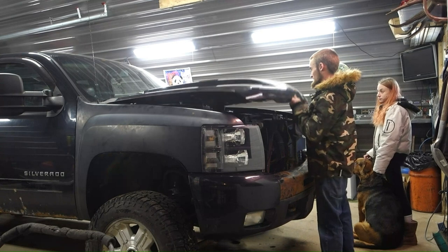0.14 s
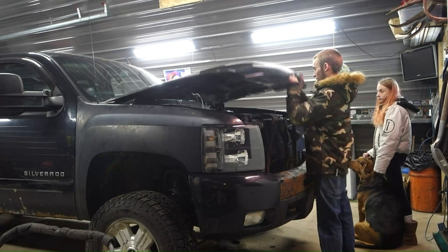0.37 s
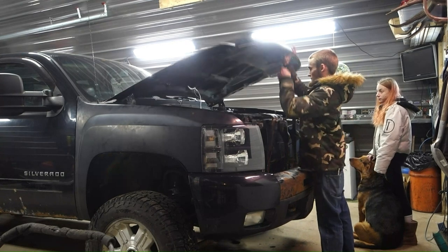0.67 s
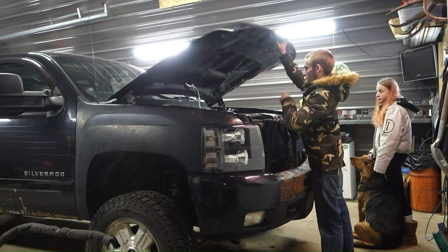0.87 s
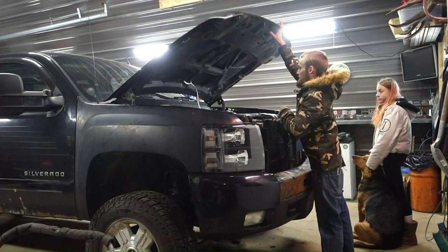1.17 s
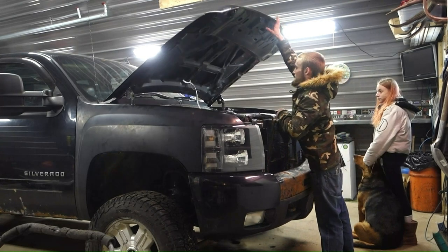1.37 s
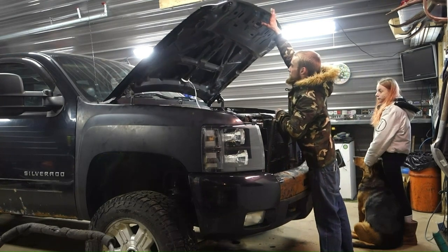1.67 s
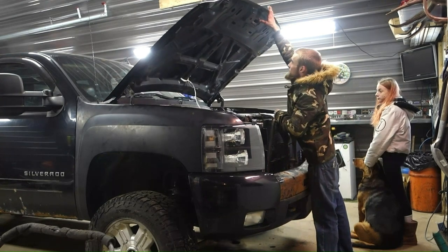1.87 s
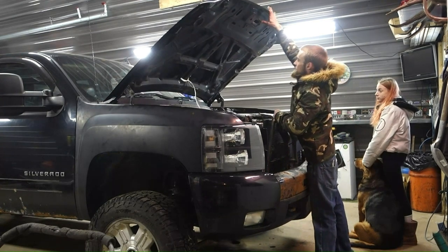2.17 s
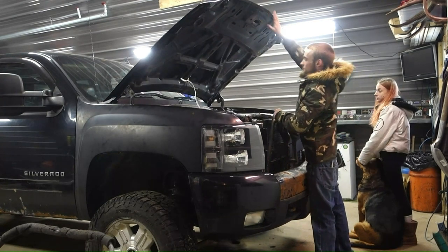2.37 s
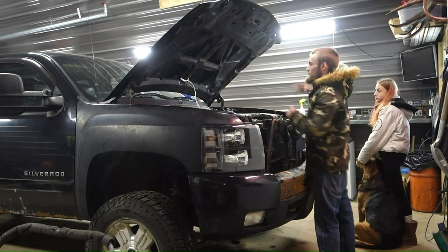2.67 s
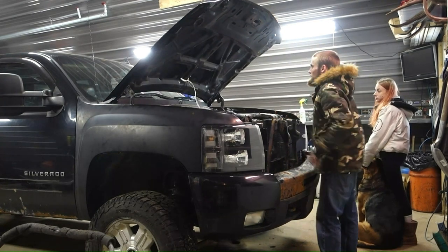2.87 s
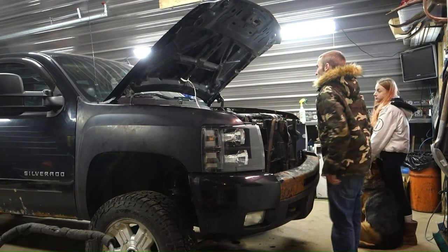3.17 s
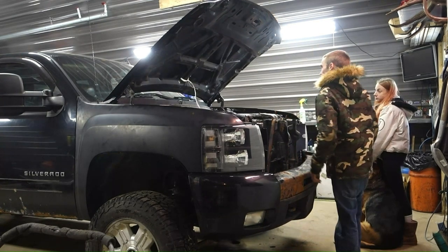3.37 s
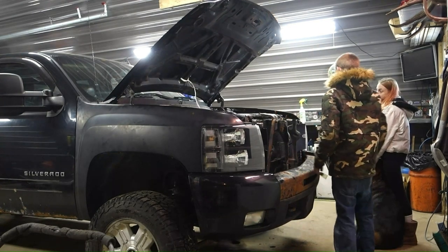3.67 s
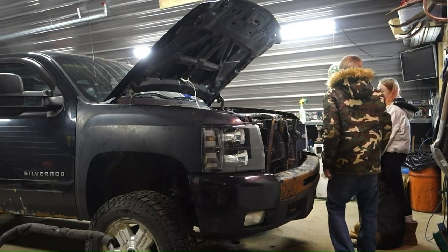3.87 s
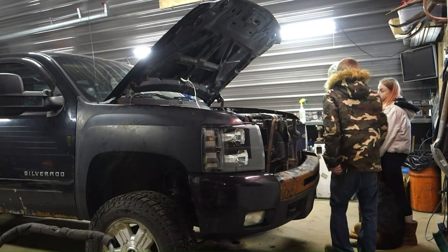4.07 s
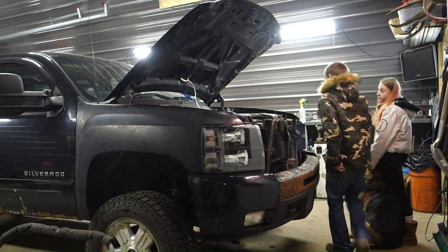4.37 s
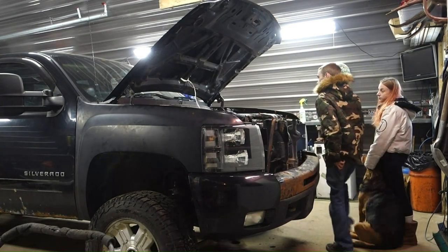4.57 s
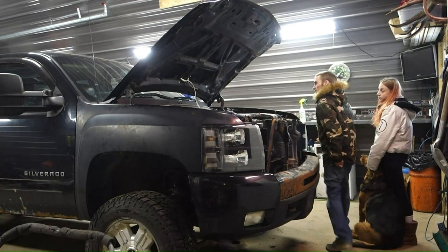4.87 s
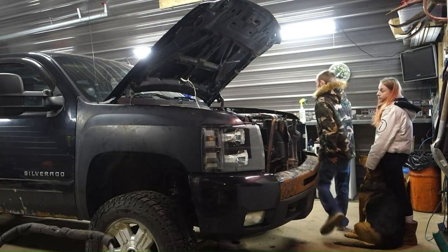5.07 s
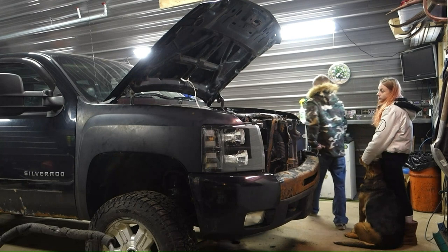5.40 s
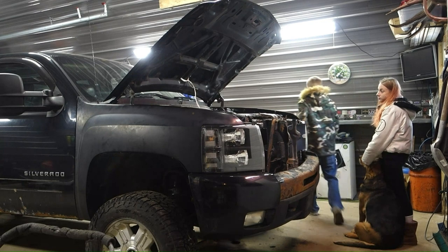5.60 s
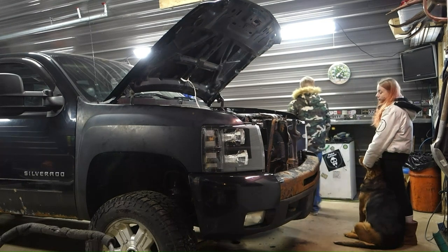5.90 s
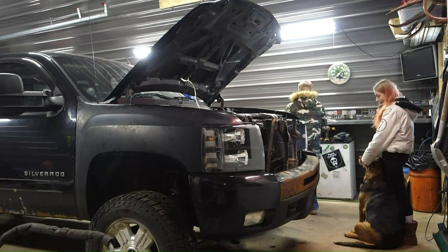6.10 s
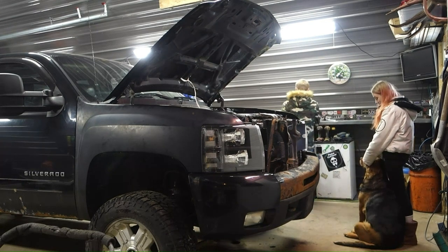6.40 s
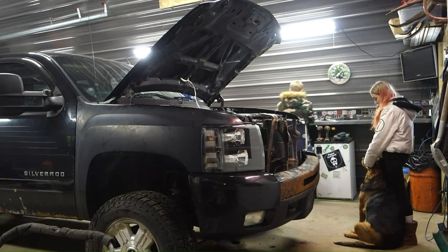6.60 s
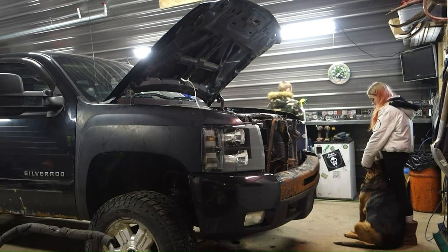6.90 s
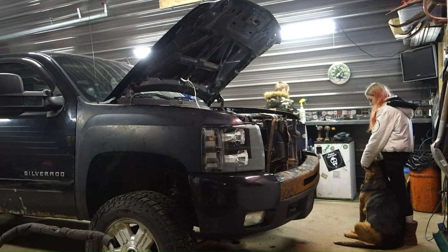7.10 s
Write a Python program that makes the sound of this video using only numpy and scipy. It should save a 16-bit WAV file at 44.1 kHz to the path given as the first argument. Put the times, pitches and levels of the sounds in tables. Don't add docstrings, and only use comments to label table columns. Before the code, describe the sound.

A low, steady heater fan drones throughout, mostly deep rumble with a duller airy roar, its hum beating about three times a second and irregular soft gusts booming in the duct. At 0.05 seconds a truck hood latch clacks free, loud and sharp, followed within forty milliseconds by a heavier rebound and a loose knock; the garage answers with a half-second tail. A faint thud comes at 0.5, then soft heel falls near 1.9. From about 2.5 to 6.1, boots scuff and step over gritty concrete, quiet and crisp, the grit growing finer and hissier. At 6.6 a last scuff merges with a light metal handle rattle, bouncing for a tenth of a second. From 6.84 to 7.1 steel tools tick and clatter brightly on a metal bench, loudest near 7.04, ringing briefly until the end. Close stereo microphones, hard-walled room.

```python
import sys
import numpy as np
from scipy import signal
from scipy.io import wavfile
from scipy.ndimage import uniform_filter1d

SR = 44100
rng = np.random.default_rng(int(sys.argv[2]) if len(sys.argv) > 2 else 0)


def wrap_up_sound(samples):
    columns = np.atleast_2d(samples).T
    tamed = np.clip(columns, -1, 1)
    steps = np.round(tamed * 32767).astype(np.int16)
    wavfile.write(sys.argv[1], SR, steps)


def gain_from_decibels(decibels):
    exponent = np.asarray(decibels, float) / 20
    return 10 ** exponent


N = 319725

# pitch_hz, level_db [dB per Hz]
FAN_RUMBLE = [(20, -21), (38, -20), (50, -11), (64, -1), (76, 3), (110, -2), (131, -1.5), (168, 1.5),
              (185, -10), (225, -11), (275, -16.5), (283, -6.5), (320, -10.5), (345, -5)]
# pitch_hz, level_db [dB per Hz]
FAN_ROAR = [(346, -5), (414, -2), (509, -16), (554, -4.5), (635, -26), (715, -16), (893, -16), (1230, -18),
            (1340, -19.5), (2620, -24.5), (5000, -43.5), (9000, -46.5), (15800, -41)]
# pitch_hz, width_hz, lift_db
DUCT = [(296.8, 17.2, 9), (317.7, 18.7, 10), (452, 21.3, 4.5), (531, 47, 4.5), (711, 94, 11.5),
        (790, 8.4, -20), (1027, 200, 6.5), (1246, 32, 9), (1673, 69, 3), (1980, 140, 3.5), (2560, 16, 12.5),
        (2760, 60, 4), (3171, 6.7, 13), (3320, 33, 9)]
# time_s, rumble_db, roar_db
SWELL = [(0.0, 3.5, 2.5), (7.25, 4.5, 1.5)]
# order [multiple of shaft speed], level_db [rms]
SHAFT_ORDERS = [(1, -37), (3, -55), (4, -47.5), (5, -43.5)]
# peak_s, peak_db [rms], length_s
GUSTS = [(0.067, -27, 0.061), (0.744, -27, 0.078), (0.907, -25, 0.037), (1.406, -25.5, 0.12),
         (1.936, -29.5, .18), (2.11, -25.5, 0.03), (2.81, -33.5, 0.042), (3.803, -31, .09),
         (4.138, -27, 0.13), (4.283, -27, 0.071), (4.477, -29, .078), (4.747, -27, .06),
         (5.006, -28.5, 0.069), (5.237, -31, 0.097), (5.343, -30, 0.062), (5.564, -26, 0.075),
         (3.16, -31.5, 0.13), (6.03, -29.5, .16), (6.389, -21.5, 0.054), (6.927, -25.5, 0.071),
         (7.064, -25.5, 0.079)]
# pitch_hz, likeness [-1 to 1]
FAN_LIKENESS = [(130, 1), (290, 0.98), (640, 0.95), (1400, 0.88), (2500, 0.91), (3500, 0.58), (4800, 0),
                (7000, 0.23), (12000, 0.38)]
# pitch_hz, left_minus_right_db
FAN_BALANCE = [(60, -2.3), (130, 0.14), (290, 0.5), (640, -0.5), (1410, -0.56), (3100, -2.9), (6820, -0.21),
               (15000, 1)]
# start_s, peak_db, rattle_length_s, treble_db, bass_db
LATCH_BLOWS = [
    (0.0463, -6, 0.0085, 1.5, -11),
    (0.064, -14.5, 0.014, -0.5, 6),
    (0.084, -18.5, 0.0067, 1, 8),
]
# pitch_hz, level_db, t60_s
HOOD_MODES = [(428, 3.5, 0.065), (480, -5, 0.46), (604, -32, 5.0), (690, -17.5, 1.1), (980, -20, 0.84),
              (1194, -21, 0.89), (1450, -20, 0.55), (1518, -34, 0.6), (1510, -29, 0.98), (1720, -10, 0.3),
              (1900, -32, 0.74), (1870, -31, 0.28), (2060, -20, 0.14), (2674, -15, 0.73), (2702, -20, 0.65),
              (3300, -19, 0.33), (3720, -42, 0.59), (5631, -47, 0.28)]
# pitch_hz, level_db [dB per Hz]
HOOD_CRACK = [(120, -48), (200, -18), (278, 1.5), (440, -3.5), (806, -16.5), (1160, -7), (2130, -9.5),
              (2290, -12.5), (3370, -19.5), (4430, -36.5), (16000, -44)]
# start_s, peak_db, pitch_hz
HEELS = [
    (0.46, -30, 310),
    (1.857, -31, 790),
    (1.886, -28.5, 440),
    (4.499, -31, 580),
    (4.864, -32, 680),
    (5.419, -34, 740),
    (5.74, -31, 304),
    (6.11, -35, 806),
]
# start_s, peak_db, slide_length_s, sole_resonance_hz, grit_hiss_db
SCUFFS = [(2.465, -45, 0.053, 2560, -7), (3.086, -30, 0.047, 2420, -4), (3.108, -28.5, 0.046, 2330, -1.5),
          (3.355, -39.5, 0.054, 1978, -7), (3.6, -34.5, 0.045, 2470, -0.5), (3.625, -33, 0.038, 2560, -8),
          (4.161, -33, 0.069, 2360, 4.5), (4.212, -27.5, 0.054, 2420, -6), (4.4, -34, 0.032, 2800, -1),
          (4.555, -27.5, 0.042, 1880, -7), (4.994, -30.5, 0.025, 2563, 0), (5.405, -33, 0.043, 2304, 13.5),
          (5.481, -33, 0.041, 2400, 4), (5.666, -30, 0.026, 2560, -1), (6.037, -26, 0.044, 2700, 5),
          (6.088, -39.5, 0.056, 2887, 9), (6.593, -37.5, 0.032, 3300, 15), (6.605, -32, 0.049, 2570, 7)]
# pitch_hz, level_db [dB per Hz]
GRIT = [(700, -42), (1300, -10.5), (2000, -8.5), (2900, -9), (3800, -11.5), (6000, -12), (9200, -15.5),
        (14700, -23), (16000, -24)]
# start_s, peak_db, rattle_length_s, treble_db, bass_db
HANDLE_BLOWS = [
    (6.608, -20, 0.013, 7.5, -3),
    (6.623, -18.5, 0.022, 0.5, -4),
    (6.654, -26, 0.021, 4, 9),
    (6.675, -23, 0.0095, 4, 14),
    (6.698, -33, 0.009, 9, 3),
]
# pitch_hz, level_db, t60_s
HANDLE_MODES = [(517, -7, 0.35), (572, 0, 0.72), (1604, -0.5, 0.49), (2025, 1, 0.4), (2150, -12, 0.33),
                (2530, -14, 0.46), (2860, -2, 0.36), (2970, -11, 0.52), (3640, -5, 0.44), (4460, -20, .3)]
# pitch_hz, level_db [dB per Hz]
HANDLE_CRACK = [(530, -42), (900, -8), (1340, -24), (1470, -34), (1570, -10), (2220, 2), (3380, -12),
                (3680, -11.5), (5350, -21.5), (16000, -37)]
# start_s, peak_db, rattle_length_s, treble_db, bass_db
TOOL_BLOWS = [
    (6.841, -10, 0.014, 10.5, -6),
    (6.928, -11.5, 0.0081, 8, -4),
    (6.959, -9.5, 0.037, 9, -2.5),
    (6.989, -22.5, 0.0067, 2.5, -2),
    (7.041, -7, 0.009, 3, 1.5),
    (7.088, -13, .008, 6.5, 8),
    (7.099, -13.5, 0.011, 6, -3),
]
# pitch_hz, level_db, t60_s
BENCH_MODES = [(364, -2, 0.84), (398, 6, 0.66), (485, -14, 0.6), (526, 5, 0.64), (745, 4, 0.72),
               (790, 2, 0.85), (916, -4, 0.27), (1233, 15, 0.12), (1400, -3, 3.9), (1610, -18, 0.3),
               (1626, -27, 0.31), (1690, -20, 0.34), (1940, 10, 0.19), (2120, 8, 0.23), (2370, -4, 0.52),
               (2524, 0, 0.72), (2780, -3, 0.23), (3155, -57, 0.83), (3200, -35, 0.46), (3500, -11, 0.41)]
# pitch_hz, level_db [dB per Hz]
BENCH_CRACK = [(150, -46.5), (250, -9), (367, 1), (444, -3.5), (510, -4), (723, -6.5), (1160, -8.5),
               (1910, -7.5), (3340, -18), (3770, -35), (16000, -38)]
# pitch_hz, level_db, t60_s
PART_MODES = [(4550, -12, .008), (7600, -2, .03), (7900, 0, .04), (8150, -5, .02), (10500, -6, .02),
              (11000, -6, .02), (14600, -10, .012)]
# pitch_hz, t60_s
GARAGE = [(200, 0.34), (500, 0.53), (1200, 0.58), (2500, 0.52), (5000, 0.54), (10000, 0.36), (16000, 0.45)]
# pitch_hz, likeness [-1 to 1]
WALL_LIKENESS = [(150, 0.9), (500, 0.97), (1200, 0.85), (2400, 1), (3500, 0.28), (4500, -0.18),
                 (7000, -0.024), (12000, 0.34)]
# pitch_hz, left_minus_right_db
WALL_BALANCE = [(500, 0.5), (1500, 1), (2400, 1), (3500, -6), (5000, -5), (7000, -1), (12000, 1.5)]


def evened(x):
    return x / np.sqrt(np.mean(x ** 2) + 1e-20)


def read(points, hz):
    f, value = np.transpose(points)
    return np.interp(np.log(hz + 1), np.log(f + 1), value)


def pair(level_db, size, likeness, balance):
    hz = np.fft.rfftfreq(size, 1 / SR)
    a, b, c, d = rng.standard_normal(level_db.T.shape + (4,)).T
    like = np.clip(read(likeness, hz), -1, 1)[:, None]
    left = a + 1j * b
    right = like * left + np.sqrt(1 - like ** 2) * (c + 1j * d)
    lead_s = 3.5e-5 * (hz < 3500)
    right = right * np.exp(2j * np.pi * hz * lead_s)[:, None]
    half_db = read(balance, hz)[:, None] / 2
    spectra = np.array([left * gain_from_decibels(half_db), right * gain_from_decibels(-half_db)]) * gain_from_decibels(level_db)
    return signal.istft(spectra, nperseg=size, noverlap=size - size // 4)[1]


def drone(spectrum, db, swell_column, size, patchy_db):
    hz = np.fft.rfftfreq(size, 1 / SR)
    t = np.arange(4 * N // size + 5) * size / 4 / SR
    lift_db = sum(lift / (1 + ((hz - f) / (width / 2)) ** 2) for f, width, lift in DUCT)
    inside = (hz >= spectrum[0][0]) & (hz <= spectrum[-1][0])
    inside_db = np.where(inside, 0, -80)
    patches = uniform_filter1d(rng.standard_normal((len(t), len(hz))), size=6, axis=0)
    patches = evened(uniform_filter1d(patches, size=30, axis=1)).T
    swell = np.array(SWELL)
    swell_db = np.interp(t, swell[:, 0], swell[:, swell_column])
    field_db = (read(spectrum, hz) + lift_db + inside_db)[:, None] + patchy_db * patches
    noise = pair(field_db + swell_db, size, FAN_LIKENESS, FAN_BALANCE)[:, :N]
    return gain_from_decibels(db) * evened(noise)


def hum():
    shaft_hz, mains_hz, mains_db, in_step_s = 56.9, 60.02, -35, 2.52
    turn = 2 * np.pi * (np.arange(N) / SR - in_step_s)
    shaft = sum(gain_from_decibels(db) * np.cos(order * shaft_hz * turn) for order, db in SHAFT_ORDERS)
    mains = gain_from_decibels(mains_db) * np.cos(mains_hz * turn)
    return np.sqrt(2) * (shaft + mains)


def boom():
    boom_hz, width_hz, murmur_db, gust_detune = 149.6, 5, -35.5, 0.011
    t = np.arange(N) / SR
    r = np.exp(-np.pi * width_hz / SR)
    turbulence = rng.standard_normal(N) + 1j * rng.standard_normal(N)
    murmur = signal.lfilter([1 - r], [1, -r], turbulence)
    murmur = murmur * gain_from_decibels(murmur_db) / np.sqrt(np.mean(abs(murmur) ** 2))
    swell = np.zeros(N, complex)
    for s, db, length in GUSTS:
        start, end = round((s - 2 * length) * SR), round((s + 2 * length) * SR)
        near = slice(max(start, 0), end)
        u = t[near] - s
        bell = np.exp(-(2 * u / length) ** 2 * np.log(2))
        offset_hz = boom_hz * gust_detune * rng.standard_normal()
        swell[near] += gain_from_decibels(db) * bell * np.exp(2j * np.pi * offset_hz * u)
    calm = 1 / (1 + (abs(swell) / gain_from_decibels(murmur_db)) ** 2)
    return np.sqrt(2) * ((swell + calm * murmur) * np.exp(2j * np.pi * boom_hz * t)).real


def colour(x, points):
    level_db = read(points, abs(np.fft.fftfreq(4096, 1 / SR)))
    log_gain = np.log(gain_from_decibels(np.maximum(level_db, -100)))
    taps = np.fft.ifft(np.exp(np.conj(signal.hilbert(log_gain)))).real[:2048]
    return signal.fftconvolve(x, taps / np.linalg.norm(taps))[:len(x)]


def ring(modes, damping):
    t = np.arange(SR // 8) / SR
    body = np.zeros(len(t))
    for hz, db, t60 in modes:
        body += gain_from_decibels(db - 60 * t / (damping * min(t60, 0.8))) * np.sin(2 * np.pi * hz * t)
    return body / np.linalg.norm(body)


def blow(db, length, treble_db, bass_db, modes, crack, ring_db):
    t = np.arange(SR // 4) / SR
    contacts = rng.random(len(t)) < 5000 / SR
    chatter = rng.standard_normal(len(t)) * contacts
    chatter = chatter * np.exp(-t / max(length, 0.001)) * np.clip(t / 0.0027, 0, 1)
    chatter = chatter / np.linalg.norm(chatter)
    struck = []
    for hz, level_db, t60 in modes:
        shift, change = rng.standard_normal(2)
        struck.append((hz * (1 + 0.024 * shift), level_db + 4.4 * change, t60))
    ringing = signal.fftconvolve(chatter, ring(struck, damping=0.11))[:len(t)]
    sound = colour(chatter, crack) + gain_from_decibels(ring_db) * ringing
    tone = [(150, -2.5), (300, bass_db), (600, bass_db), (1100, 0.5), (3000, -0.5), (5000, treble_db)]
    return 12 * gain_from_decibels(db) * colour(sound, tone) * gain_from_decibels(max(bass_db, 0) / 4)


def add(mix, s, sound, pan_db):
    part = mix[:, round(s * SR):][:, :len(sound)]
    part += sound[:part.shape[1]] * gain_from_decibels(np.array([[pan_db / 2], [-pan_db / 2]]))


def strike(mix, blows, pan_db, drift_db_per_s, modes, crack, ring_db):
    first_s = blows[0][0]
    for s, *row in blows:
        add(mix, s, blow(*row, modes, crack, ring_db), pan_db + drift_db_per_s * (s - first_s))


def heel(db, hz):
    t = np.arange(SR // 10) / SR
    push = rng.standard_normal(len(t)) * gain_from_decibels(-60 * t / 0.067) * np.clip(t / 0.0068, 0, 1)
    thud = [(hz / 3, -25), (hz / 1.4, 0), (hz * 1.4, 0), (hz * 4, -25), (16000, -60)]
    return gain_from_decibels(db + 3) * colour(push, thud)


def scuff(db, length, sole_hz, grit_db, fine_db):
    t = np.arange(SR // 6) / SR
    press = np.clip(t / 0.014, 0, 1) * np.clip((max(length, 0.02) - t) / 0.037, 0, 1)
    snaps = rng.random(len(t)) < 7000 / SR
    grain_db = 3.0 * np.minimum(rng.exponential(1, len(t)), 4)
    grains = rng.standard_normal(len(t)) * gain_from_decibels(grain_db) * snaps
    grains = grains * press * np.linalg.norm(press) / np.linalg.norm(grains * press)
    r = np.exp(-np.pi * 1500 / SR)
    zeros = [1 - r, 0, r - 1]
    poles = [1, -2 * r * np.cos(2 * np.pi * sole_hz / SR), r * r]
    sole = signal.lfilter(zeros, poles, signal.lfilter(zeros, poles, grains))
    grit = [(hz, level + fine_db * np.clip(np.log2(hz / 6000), 0, 1)) for hz, level in GRIT]
    return gain_from_decibels(db - 13.5) * (gain_from_decibels(grit_db) * colour(grains, grit) + 5.86 * sole)


def garage(x, wet_db):
    hz, t = np.fft.rfftfreq(256, 1 / SR), np.arange(700) * 64 / SR
    decay_db = -60 * t / np.maximum(read(GARAGE, hz), 0.05)[:, None]
    tail = pair(decay_db, 256, WALL_LIKENESS, WALL_BALANCE)
    tail = tail * np.clip(np.arange(tail.shape[1]) / SR / 0.0039, 0, 1)
    direct = np.array([np.roll(x[0], shift=2), x[1]])
    reflected = signal.fftconvolve(x, tail / np.linalg.norm(tail[0]), axes=1)[:, :N]
    return direct + gain_from_decibels(wet_db) * reflected


def close_ports(x):
    mid, side = (x[0] + x[1]) / 2, (x[0] - x[1]) / 2
    side = signal.lfilter(*signal.butter(1, 260, "high", fs=SR), side)
    return np.array([mid + side, mid - side])


def scene():
    hood, floor, bench = np.zeros((3, 2, N))
    heater = drone(FAN_RUMBLE, -30.5, swell_column=1, size=8192, patchy_db=0.73)
    heater = heater + drone(FAN_ROAR, -36, swell_column=2, size=2048, patchy_db=0.37)
    heater = heater + hum() + boom()
    strike(hood, LATCH_BLOWS, -3, 160, HOOD_MODES, HOOD_CRACK, ring_db=-4.0)
    for s, db, hz in HEELS:
        add(floor, s, heel(db, hz), pan_db=0)
    for s, *row in SCUFFS:
        fine_db = 2.5 * (s - 4.56)
        add(floor, s, scuff(*row, fine_db), pan_db=-2.0)
    strike(floor, HANDLE_BLOWS, -2.1, 5, HANDLE_MODES, HANDLE_CRACK, ring_db=-3.5)
    strike(bench, TOOL_BLOWS, -3.5, 15, BENCH_MODES, BENCH_CRACK, ring_db=-3.5)
    tick = 15 * gain_from_decibels(-36) * ring(PART_MODES, damping=0.69)
    add(bench, 6.843, tick, pan_db=0)
    return garage(hood, wet_db=4.5) + garage(floor, wet_db=3.5) + garage(bench, wet_db=5.5) + heater


def roll_off(x):
    return signal.sosfilt(signal.butter(12, 16950, fs=SR, output="sos"), x)


def record(dry):
    ceiling, edge_hz = 1.1, 15790
    preamp = ceiling * np.tanh(close_ports(dry) / ceiling)
    band_limit = signal.firwin(1023, edge_hz, window=("kaiser", 9), fs=SR)
    mix = signal.oaconvolve(preamp, band_limit[None], "same")
    return roll_off(mix)


dry = scene()
out = record(dry)
wrap_up_sound(out)
```